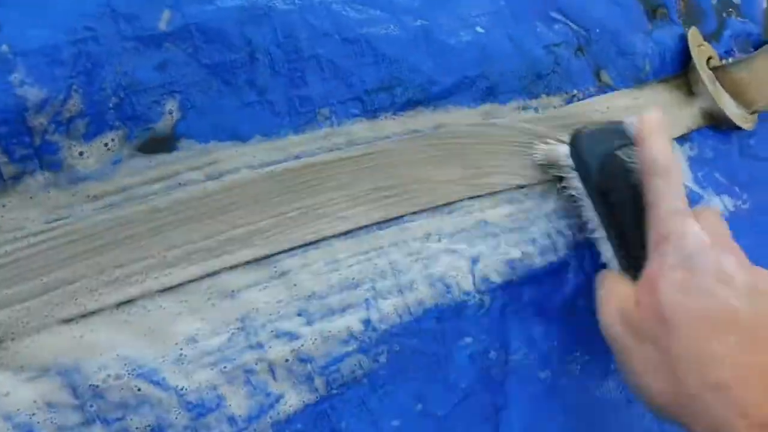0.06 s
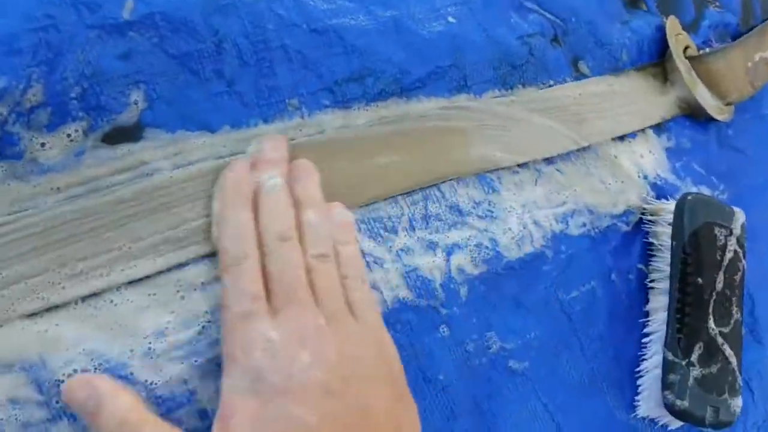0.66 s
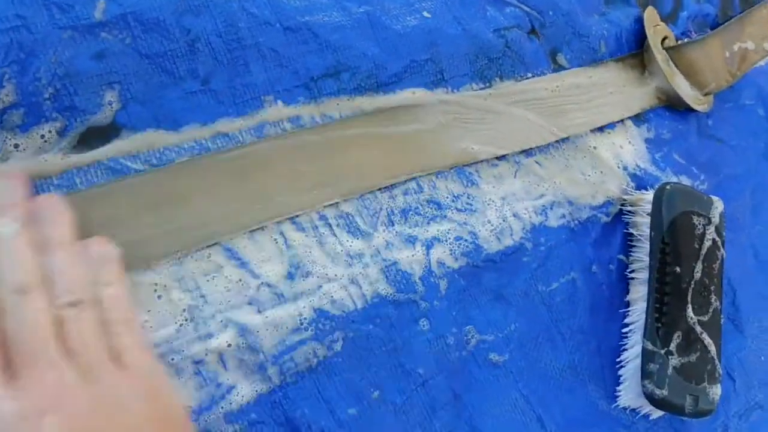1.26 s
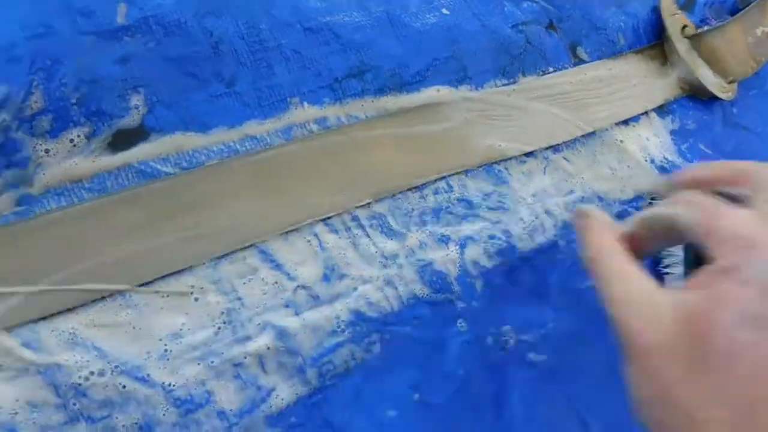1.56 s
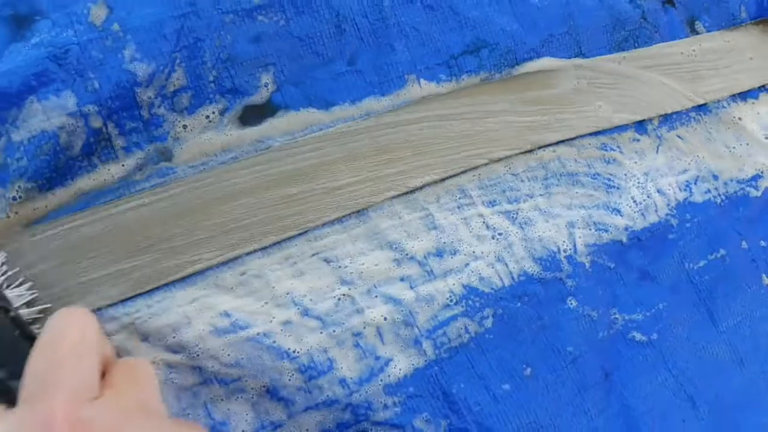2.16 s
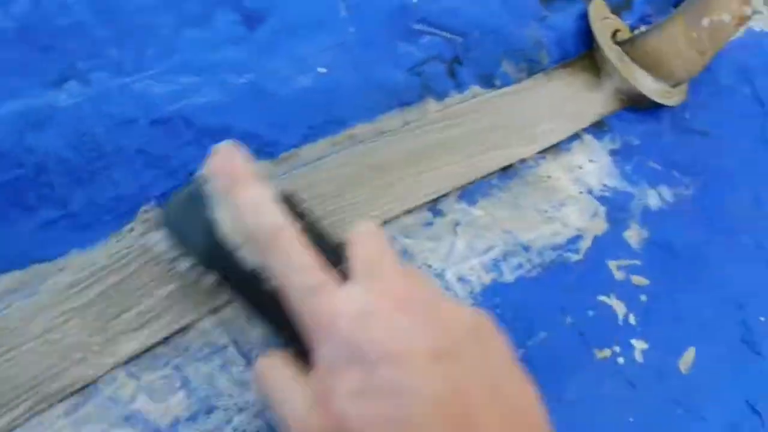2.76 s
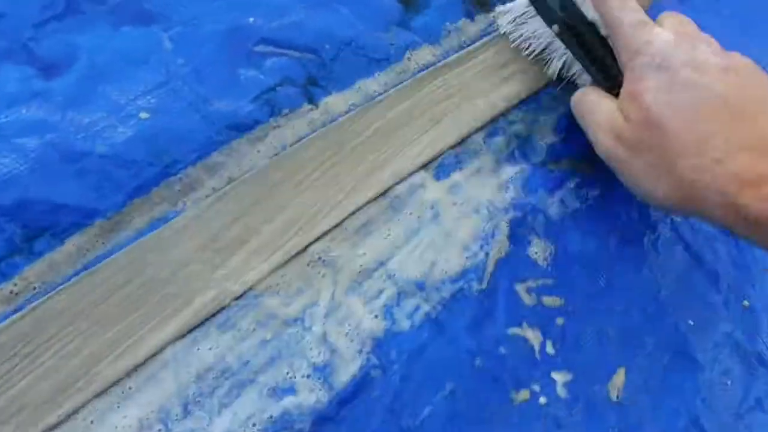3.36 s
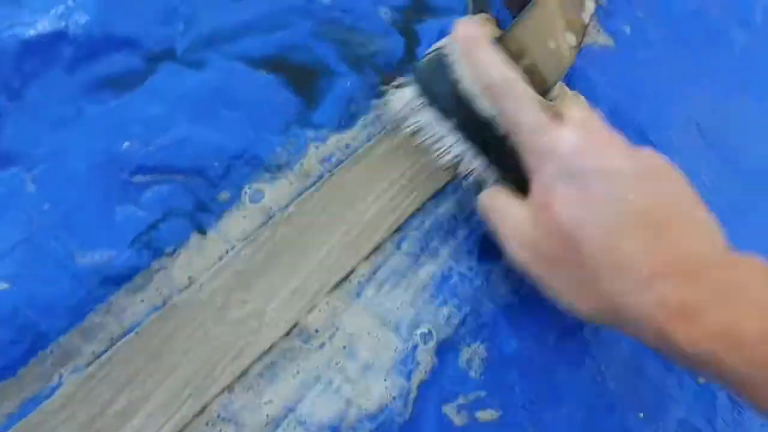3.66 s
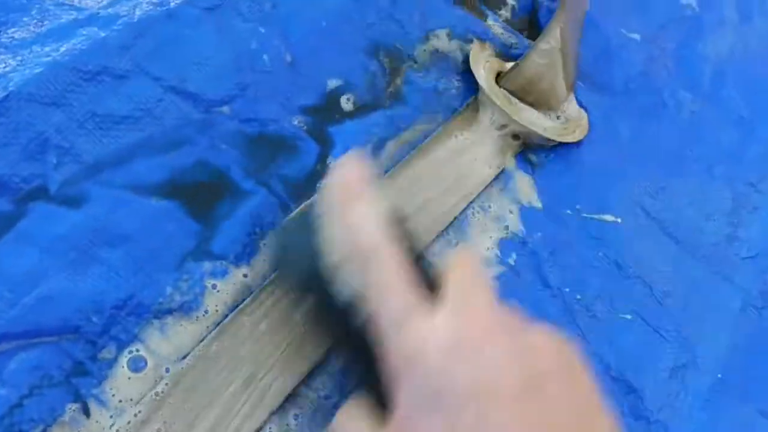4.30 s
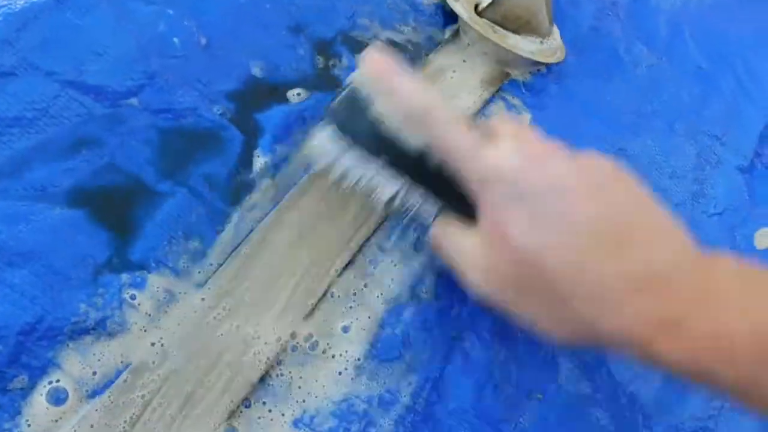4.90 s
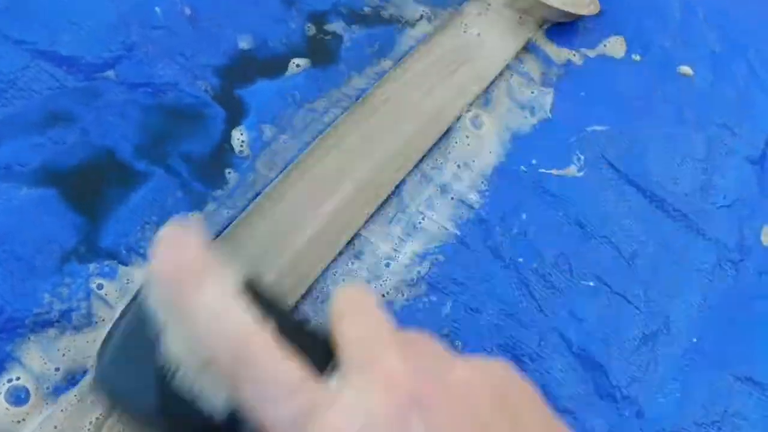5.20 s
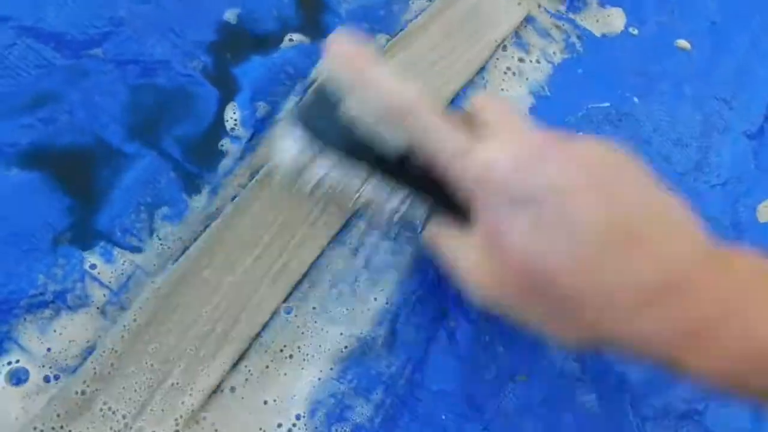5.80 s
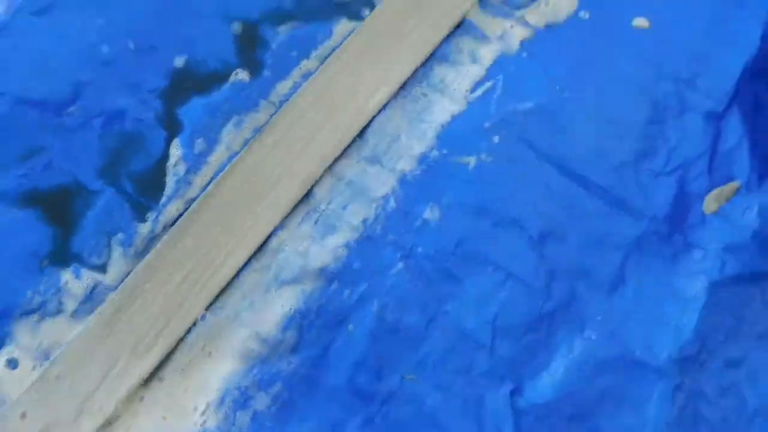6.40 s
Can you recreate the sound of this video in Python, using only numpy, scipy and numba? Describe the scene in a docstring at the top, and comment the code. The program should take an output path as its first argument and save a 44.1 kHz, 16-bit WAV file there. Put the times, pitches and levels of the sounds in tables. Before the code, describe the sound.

A stiff plastic brush finishes a stroke on a soapy seat belt lying on a tarpaulin. A hand wipes softly through the foam for a moment, then the brush returns with about four seconds of quick, wet, rasping back-and-forth strokes, its block knocking now and then. It stops, and the wet webbing shifts with small snaps and squelches. The sound is close, outdoors, with light wind on the microphone.

```python
"""Outdoors on a tarpaulin, close to the microphone, a stiff plastic brush scrubs a soapy seat belt.
Each stroke is an arch of speed: bristle flicks drum the tarpaulin and burst the lather, a wet hollow
rises in pitch going up the belt and falls coming back, and now and then the brush block knocks.
In the pauses a hand wipes and shifts the wet webbing, with snaps, squelches and dull bumps.
Light wind touches the microphone over a quiet background."""
import sys
import numpy as np
from scipy import signal
from scipy.fft import rfft, irfft
from scipy.io import wavfile
from numba import njit

SR = 44100
rng = np.random.default_rng(int(sys.argv[2]) if len(sys.argv) > 2 else 0)


def unload_audio(sound):
    """Save the sound as a 16-bit wav file, at the path given as the first command line argument."""
    columns = np.transpose(np.atleast_2d(sound))
    # keep every value between -1 and 1, then stretch to whole-number steps
    steps = np.round(np.clip(columns, -1, 1) * 32767)
    wavfile.write(sys.argv[1], SR, steps.astype(np.int16))


N = 293265
TIME = np.arange(N) / SR
FREQ = np.maximum(np.arange(N // 2 + 1) * SR / N, 1)
TOP_HZ = 12050


def brush(landing_s=0.008):
    """Stick-slip friction: bristles catch on the weave and flick free, more often the faster they go."""
    # strokes, up and down the belt by turns: (start [s], fastest [s], end [s], level [dB],
    # weight on the tarpaulin [dB], brightness [dB], wet hollow [Hz], rustle in the next turn [dB])
    strokes = np.array([(-.12, -.027, 0.051, -17, -11.5, -4.5, 2400, -30.5),
                        (-.064, 0.166, .204, -28, -16.5, -5, 2520, -49),
                        (0.199, 0.231, 0.28, -33.5, -12, -7, 2630, -49),
                        (1.889, 2.085, 2.208, -19.5, -9.5, -6.5, 2270, -38.5),
                        (2.211, 2.388, 2.5, -18.5, -11.5, -7, 2260, -41.5),
                        (2.517, 2.615, 2.729, -19, -15, -8, 1925, -37.5),
                        (2.749, 2.855, 2.988, -15.5, -10.5, -7, 2190, -40),
                        (3.04, 3.122, 3.187, -18, -11.5, -8, 2006, -34.5),
                        (3.202, 3.274, 3.4, -17.5, -7.5, -8, 2100, -35.5),
                        (3.439, 3.522, 3.586, -17, -12.5, -8.5, 2260, -32),
                        (3.593, 3.661, 3.772, -18.5, -7.5, -8.5, 2250, -37.5),
                        (3.806, 3.897, 4.003, -19.5, -9.5, -8, 2346, -38),
                        (3.999, 4.08, 4.203, -19, -5, -7.5, 2500, -42),
                        (4.234, 4.324, 4.41, -18.5, -8.5, -7.5, 2120, -36.5),
                        (4.422, 4.508, 4.624, -18.5, -8, -7.5, 2460, -36.5),
                        (4.655, 4.765, 4.83, -17.5, -9.5, -7, 2183, -34),
                        (4.846, 4.937, 5.043, -17, -7.5, -8, 2420, -35),
                        (5.067, 5.198, 5.26, -17.5, -9, -8.5, 2220, -32),
                        (5.274, 5.359, 5.47, -16.5, -9.5, -7, 2350, -36),
                        (5.505, 5.597, 5.714, -15.5, -8, -6.5, 2030, -34),
                        (5.728, 5.831, 5.956, -17.5, -6.5, -6.5, 2424, -34.5)])
    # bristles touching the belt: (down [s], lifted [s])
    contacts = [(-.1, 0.316), (1.921, 5.998)]
    # bristle spectrum: (frequency [Hz], level [dB])
    bristle_colour = [(71, -54), (120, -28), (194, -24.5), (583, -5), (907, -1.5), (1190, -1.5),
                      (1330, -4.5), (1890, -3), (4490, -7), (5450, -11), (7270, -10.5), (8320, -11.5),
                      (9710, -12.5), (12000, -15), (15600, -52), (22000, -120)]
    scrub, hollow_hz = rubbing(strokes[:, :-1], powers=(0.85, 0.95, 1), sweep_octaves=0.51)
    # in a turn the bristles only bend over: a rustle with weaker lows and highs
    turn = undb(np.interp(TIME, strokes[:, 2], strokes[:, -1])) * undb([[-8.5], [0], [-8]])
    contact = sum(np.clip(np.minimum(TIME - down, lifted - TIME) / landing_s, 0, 1)
                  for down, lifted in contacts)
    weight, level, bright = np.hypot(scrub, turn) * bites() * contact
    speed = np.sqrt(level / level.max())
    flicks = clicks(1500 + 14000 * speed, spread_db=2)
    lather = bubbles(600 + 3500 * speed, spread_db=3, cycles=12)
    low, middle, high = zones(colour(flicks + undb(-8) * lather, bristle_colour))
    wet = hollow(middle, hollow_hz, width_hz=850, db=-7)
    # whole tufts stick and slip together; the tarpaulin feels this most
    slip = walk(130)
    drum = undb(0.13 + slip + 0.74 * walk(70)) * weight * low
    rasp = undb(-0.26 + slip) * level * wet
    hiss = undb(0.7 + 0.28 * slip) * bright * high
    return drum + rasp + hiss


def bites():
    """Friction grows with load: low, middle and high gains as the hand bears down, the highs most."""
    # pushes of the hand: (start [s], hardest [s], end [s], extra rasp [dB])
    pushes = [(2.043, 2.076, 2.124, 2.5), (2.378, 2.403, 2.448, 2.4), (2.579, 2.62, 2.65, 1.4),
              (3.255, 3.304, 3.314, 4), (3.624, 3.667, 3.711, 2.5), (4.089, 4.119, 4.132, 3.5),
              (4.516, 4.55, 4.56, 3.5), (4.924, 4.961, 4.993, 3), (5.088, 5.148, 5.177, 3.5),
              (5.368, 5.405, 5.423, 2.5), (5.801, 5.885, 5.909, 5)]
    db = np.zeros(N)
    for start, hardest, end, extra_db in pushes:
        during, push, _ = swing(start, hardest, end)
        db[during] += extra_db * push
    return undb([0.25 * db, db, 1.52 * db])


def knocks():
    """An impact excites damped modes: the block hits the ground through the belt and rebounds once."""
    # blows: (time [s], relative peak [dB], relative gain of the deep modes [dB])
    blows = [(3.336, -5, -3), (3.353, 2, -1), (3.7, -1, 6), (4.124, -0.5, 4.5), (4.139, -11, -17),
             (4.163, 4.5, -11), (4.283, -3, -5), (4.582, -2, -4), (5.431, 2, -3), (5.897, 3, 0.5)]
    # modes of a knock: (frequency [Hz], t60 [s], level [dB])
    block_modes = np.array([(485, 0.0053, 8), (710, 0.0078, -1), (1030, 0.0062, 13), (1580, 0.01, 1),
                            (2920, 0.0065, 13), (3080, 0.009, -3), (3960, 0.011, -3)])
    out, t = np.zeros(N), np.arange(2048) / SR
    deep = block_modes[:, :1] < 1200
    for s, db, deep_db in blows:
        body = (ring(block_modes, t) * np.where(deep, undb(deep_db + 2), 1)).sum(axis=0)
        click = undb(-23) * rng.standard_normal(len(t)) * np.exp(-t / 0.0028)
        blow = (body + click) * (1 - np.exp(-t / 0.00027))  # the wet belt cushions the contact
        blow *= undb(db - 4.5) / np.abs(blow).max()
        add(out, s + 0.001085, blow)
        add(out, s + 0.00257, undb(-14.5) * blow)
    # so small a block radiates no bass
    return signal.sosfilt(signal.butter(3, 380, "high", fs=SR, output="sos"), out)


def wipes():
    """Sliding friction: skin and webbing move through foam with a soft, uneven crackle."""
    # slides: (start [s], fastest [s], end [s], level [dB], weight on the tarpaulin [dB],
    # brightness [dB], wet hollow [Hz])
    slides = [(.275, .307, .33, -38, -12, -8, 2610), (.3, .5, 0.74, -50, -7.5, -9.5, 1900),
              (.62, .78, 1, -58.5, 0, -8, 2050), (1.095, 1.215, 1.32, -44.5, -4, -7.5, 2060),
              (1.24, 1.3, 1.38, -56, 2, -7, 1900), (1.335, 1.372, 1.41, -49, -2, -5, 2000),
              (1.692, 1.712, 1.745, -47, -1, -5, 2060), (1.705, 1.78, 1.803, -37, -16, -6.5, 2550),
              (5.93, 6.01, 6.25, -53.5, -3, -6, 2400), (6.155, 6.25, 6.305, -31, -12, -8.5, 2040),
              (6.22, 6.38, 6.65, -37, -10, -9, 2300), (6.475, 6.503, 6.51, -35, -1.5, 0, 2130),
              (6.48, 6.57, 6.76, -45.5, -5, -4.5, 2042)]
    # foam spectrum: (frequency [Hz], level [dB])
    wipe_colour = [(120, -59), (200, -53), (229, -29), (620, -15), (1090, -10.5), (1210, -6), (1920, -4.5),
                   (3870, -6), (5460, -13.5), (7690, -18), (12000, -24.5), (15600, -53), (22000, -120)]
    (weight, level, bright), hollow_hz = rubbing(slides, powers=(1.58, 1.58, 1.58), sweep_octaves=0)
    foam = clicks(4000, spread_db=2) + undb(-5.5) * bubbles(1500, spread_db=4, cycles=8.8)
    low, middle, high = zones(colour(foam, wipe_colour))
    wet = hollow(middle, hollow_hz, width_hz=1800, db=-2)
    crackle = undb(1.5) * weight * low + undb(0.5) * level * wet + undb(1) * bright * high
    return undb(1.7 * walk(110)) * crackle


def rubbing(moves, powers, sweep_octaves):
    """Friction noise as a power of speed: low, middle and high amplitudes, and the hollow's pitch."""
    energy, pitch, share = np.zeros((3, N)), np.zeros(N), np.zeros(N)
    for k, (start, fastest, end, db, weight_db, bright_db, hz) in enumerate(moves):
        during, speed, travel = swing(start, fastest, end)
        for band, band_db, power in zip(energy, (weight_db, 0, bright_db), powers):
            band[during] += (undb(db + band_db) * speed ** power) ** 2
        pitch[during] += speed * hz * 2 ** ((-1) ** k * sweep_octaves * travel)  # up and down by turns
        share[during] += speed
    moving = share > 0
    return np.sqrt(energy), np.interp(TIME, TIME[moving], pitch[moving] / share[moving])


def bubbles(rate, spread_db, cycles, count=16):
    """Bubble resonance: air pockets of many sizes burst in the lather, each ringing for some cycles."""
    out = 0
    for hz in np.geomspace(450, 11000, count):
        pole = np.exp((2j * np.pi - np.log(1000) / cycles) * hz / SR)
        pops = signal.lfilter([1], [1, -pole], clicks(rate / count, spread_db)).real
        out = out + unit(pops) * np.sqrt(hz)
    return unit(out)


def hollow(x, hz, width_hz, db):
    """Cavity resonance: the wet hollow under brush or palm rings, at db against the direct sound."""
    return unit(x + undb(db) * unit(resonate(x, hz, float(width_hz))))


def snaps():
    """Sudden release of tension: a wet film or a crease cracks and rings a small air pocket."""
    # snaps of lather and tarpaulin: (time [s], relative peak [dB], ring [Hz], brightness [dB])
    releases = [(0.3052, -24, 3000, -15), (0.341, -31.5, 2800, -15), (0.415, -28.5, 2250, -6),
                (0.4435, -30, 2590, -17), (0.5623, -23.5, 4180, -11), (1.076, -18, 1700, -7),
                (1.707, -25, 2170, -14), (1.719, -25, 1720, -23), (1.7957, -33, 2430, -16),
                (6.1749, -24, 1720, -22), (6.2382, -18, 2190, -26), (6.243, -11, 1870, -32),
                (6.2544, -19, 2800, -23), (6.3063, -11.5, 1980, -10), (6.3356, -19, 2080, -28),
                (6.3764, -22, 2280, -20), (6.392, -17, 2800, -27), (6.4502, -11.5, 2020, -1),
                (6.458, -15, 1990, -11), (6.4933, -13, 2160, -20), (6.496, -17, 3100, -15),
                (6.5089, -11.5, 3460, 2)]
    # air pocket modes: (frequency ratio [1], t60 [s], level [dB])
    pocket_modes = np.array([(1, 0.015, 6), (1.27, 0.011, 0), (1.52, 0.0074, 5.5)])
    out, t = np.zeros(N), np.arange(2048) / SR
    for s, db, hz, bright_db in releases:
        crack = signal.lfilter([1, -1], [1, -1.1, .42], rng.standard_normal(len(t))) * np.exp(-t / .003)
        pocket = ring(pocket_modes * [hz, 1, 1], t).sum(axis=0)
        snap = (pocket + undb(bright_db + 5.5) * crack) * (1 - np.exp(-t / 0.00075))
        add(out, s + .0005, snap * undb(db - 3.5) / np.abs(snap).max())
    return out


def squelches():
    """Impulse-driven resonance: spurts of water ring the air pocket under the belt."""
    # water and air squeezed out: (start [s], end [s], level [dB], pocket [Hz])
    squeezes = [(0.456, .69, -49, 1540), (2.583, 2.659, -23, 1750), (6.17, 6.235, -34, 1760),
                (6.213, 6.276, -28.5, 1940)]
    out = 0
    for start, end, db, hz in squeezes:
        press = np.sqrt(arch(start, end))
        pocket_hz = hz * (1 + 0.023 * walk(60))
        spurts = resonate(clicks(900, spread_db=4), pocket_hz, width_hz=450.)
        out = out + undb(db) * press * unit(resonate(spurts, pocket_hz, width_hz=900.))
    return out


def bumps():
    """A heavily damped oscillation: the hand's weight lands on the tarpaulin with a dull ring."""
    # landings: (time [s], level [dB], pitch [Hz])
    landings = [(.555, -38, 125), (.6, -41, 110), (.715, -45, 90), (2.179, -37, 84.5), (2.215, -46, 74.6),
                (4.195, -23.5, 252), (4.203, -42, 232)]
    out, t = np.zeros(N), np.arange(4096) / SR
    for s, db, hz in landings:
        add(out, s, undb(db) * np.sin(2 * np.pi * hz * t) * np.exp(-t * hz / 1.6))
    return out


def squeak(db=-47.5, waver=0.014):
    """Random frequency modulation: a faint squeak wavers after the last stroke."""
    # partials: (frequency [Hz], level [dB])
    partials = [(1110, 0), (2150, -11), (2860, -7)]
    # when it sounds: (start [s], end [s])
    span = (6.02, 6.165)
    tone = 0
    for hz, partial_db in partials:
        pitch = hz * (1 + waver * walk(220))
        tone = tone + undb(partial_db) * np.sin(2 * np.pi * np.cumsum(pitch) / SR)
    return undb(db + 2 * walk(130)) * arch(*span) * unit(tone)


def interference(x):
    """Destructive interference: narrow bands of the close sounds cancel at the microphone."""
    # cancelled bands: (centre [Hz], width [Hz])
    notches = [(1190, 90), (5500, 120), (8290, 400)]
    for hz, width_hz in notches:
        notch = signal.iirnotch(hz, hz / width_hz, fs=SR)
        x = signal.lfilter(*notch, signal.lfilter(*notch, x))
    return x


def wind(breeze_db=-57):
    """Turbulent pressure: a wandering breeze and a few gusts rumble on the microphone."""
    # gusts, silent unless the end follows the start: (start [s], strongest [s], end [s], level [dB])
    gusts = [(-.1, 0.0, 0.17, -53), (.46, .55, 0.58, -55), (0.693, .725, 0.83, -55),
             (2.101, 2.182, 2.37, -48), (3.895, 4.153, 4.3, -42), (4.193, 4.417, 4.68, -43.5),
             (5.03, 5.105, 5.17, -51), (5.84, 5.89, 5.6, -49.5)]
    # rumble spectrum: (frequency [Hz], level [dB])
    wind_colour = [(20, -4), (60, -4), (110, -2), (200, -7.5), (400, -6.5), (900, -55)]
    strength = undb(breeze_db + 1.5 * walk(5.2))
    for start, strongest, end, db in gusts:
        during, speed, _ = swing(start, strongest, end)
        strength[during] = np.hypot(strength[during], undb(db) * speed)
    return strength * undb(2 * walk(30)) * unit(colour(rng.standard_normal(N), wind_colour))


def background(db=-51.5):
    """Broadband ambient noise: the quiet, nearly steady sound of the open air."""
    # outdoor spectrum: (frequency [Hz], level [dB])
    outdoor_colour = [(15, -30), (25, -28), (98, -11), (183, -29), (231, -0.5), (269, -6.5), (340, -12.5),
                      (500, -7), (541, -5), (584, -8), (648, -7.5), (1170, -12), (6460, -19), (7940, -17.5),
                      (12000, -23.5), (15600, -72), (22000, -120)]
    return undb(db + 0.4 * walk(5.2)) * unit(colour(rng.standard_normal(N), outdoor_colour))


def swing(start, fastest, end):
    """One move from rest to rest: its samples, its speed (an arch, 0 to 1) and its travel (-.5 to .5)."""
    during = slice(*np.searchsorted(TIME, [start, end]))
    angle = np.pi * np.interp(TIME[during], [start, fastest, end], [0, .5, 1])
    return during, np.abs(np.sin(angle)), -np.cos(angle) / 2


def arch(start, end):
    """Half-sine envelope between two times."""
    return np.abs(np.sin(np.pi * np.clip((TIME - start) / (end - start), 0, 1)))


def clicks(rate, spread_db):
    """Shot noise: random impulses of uneven size, rate a second, at even mean power."""
    chance = np.clip(rate / SR, 1e-4, 1)
    size = undb(spread_db * np.minimum(rng.exponential(size=N), 4))
    return unit((rng.random(N) < chance) * size * rng.choice([-1, 1], N) / np.sqrt(chance))


def ring(modes, t):
    """Free decay of damped modes, one row each, a little detuned at every blow."""
    hz, t60, db = np.transpose(modes)[:, :, None]
    detune = 1 + 0.06 * rng.standard_normal(hz.shape)
    phase = 2 * np.pi * (hz * detune * t + rng.random(hz.shape))
    return undb(db) * np.sin(phase) * np.exp(-np.log(1000) * t / t60)


@njit
def resonate(x, hz, width_hz):
    """Second-order resonator: a band-pass whose centre moves from sample to sample."""
    y, band, low = np.empty(len(x)), 0., 0.
    for i in range(len(x)):
        tuning, damping = np.tan(np.pi * hz[i] / SR), width_hz / hz[i]
        velocity = (band + tuning * (x[i] - low)) / (1 + tuning * (tuning + damping))
        band, low = 2 * velocity - band, low + 2 * tuning * velocity
        y[i] = damping * velocity
    return y


def colour(x, points):
    """Filter by a spectrum of (frequency [Hz], level [dB]) points."""
    hz, db = np.transpose(points)
    return irfft(rfft(x) * undb(np.interp(np.log(FREQ), np.log(hz), db)), N)


def zones(x):
    """Crossover into low, middle and high bands of rms 1."""
    low = 1 / (1 + (FREQ / 1190) ** 12)
    high = 1 / (1 + (5400 / FREQ) ** 16)
    spectrum = rfft(x) * (FREQ < TOP_HZ)
    return [unit(irfft(spectrum * part, N)) for part in (low, 1 - low - high, high)]


def walk(rate):
    """Random drift of rms 1 that changes course rate times a second."""
    knots = rng.standard_normal(4096)
    return unit(np.interp(TIME * rate, np.arange(len(knots)), knots))


def add(out, s, sound):
    """Mix a short sound in at time s."""
    i = max(int(s * SR), 0)
    out[i:i + len(sound)] += sound[:max(N - i, 0)]


def undb(db):
    """Decibels to gain."""
    return 10 ** (np.asarray(db) / 20)


def unit(x):
    """Scale to rms 1."""
    return x / np.sqrt(np.mean(x ** 2) + 1e-18)


def scene():
    """Superposition: brush and hand close by, in the open air."""
    work = brush() + wipes() + squelches() + knocks() + bumps() + snaps()
    return (interference(work) + squeak() + background() + wind())[None]


def record(dry):
    """Soft saturation rounds the highest peaks, and a steep low-pass cuts the top."""
    rounded = dry / (1 + (dry / .95) ** 6) ** (1 / 6)
    return signal.sosfilt(signal.ellip(10, .2, 80, TOP_HZ, fs=SR, output="sos"), rounded)


dry = scene()
out = record(dry)
unload_audio(out)
```